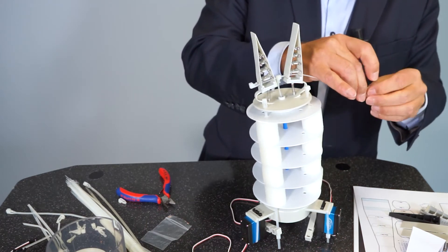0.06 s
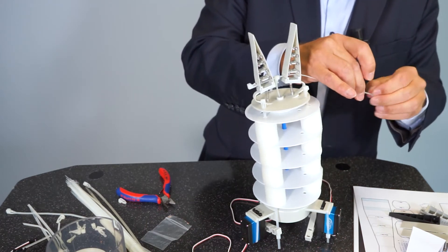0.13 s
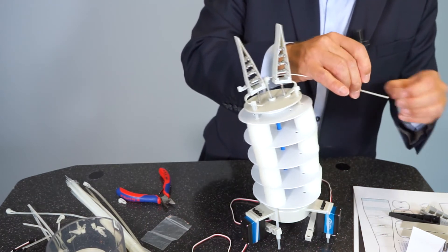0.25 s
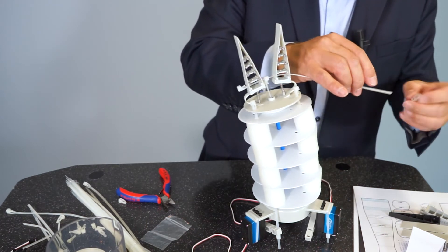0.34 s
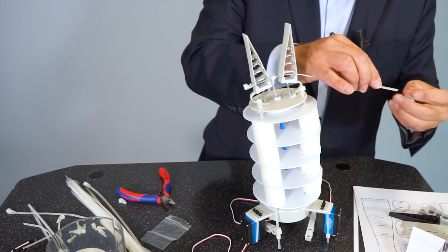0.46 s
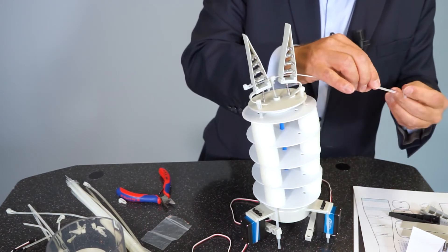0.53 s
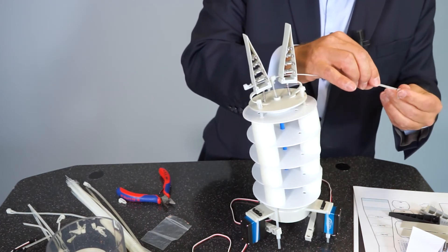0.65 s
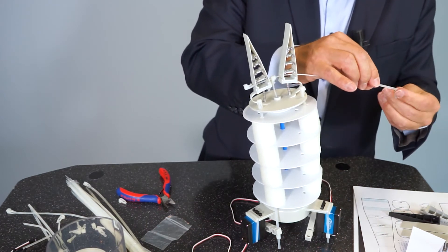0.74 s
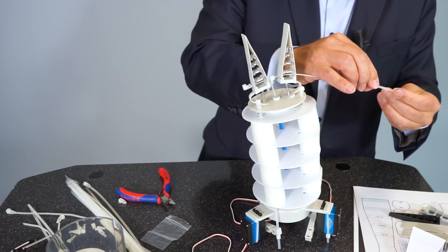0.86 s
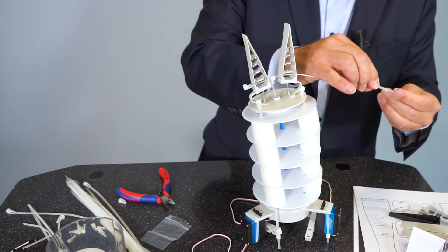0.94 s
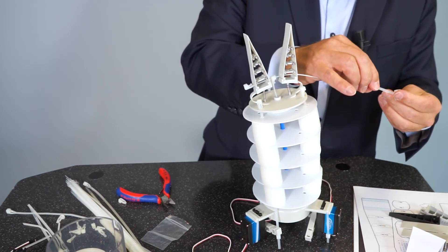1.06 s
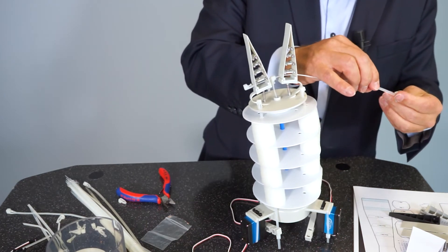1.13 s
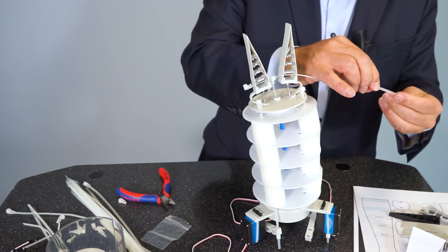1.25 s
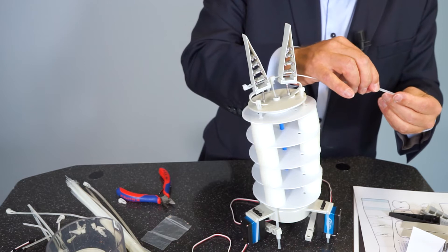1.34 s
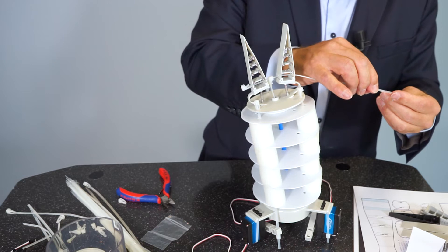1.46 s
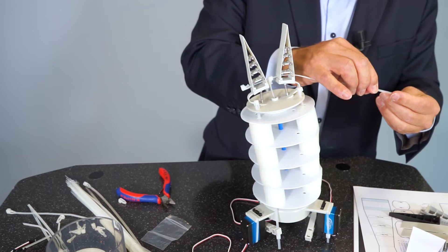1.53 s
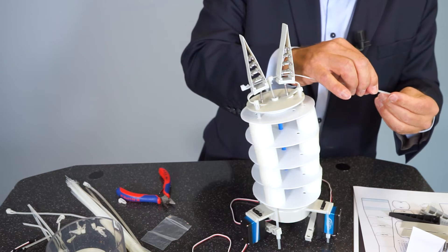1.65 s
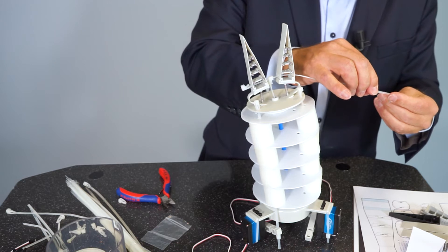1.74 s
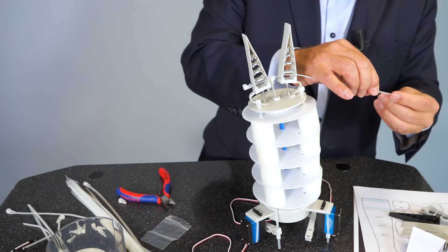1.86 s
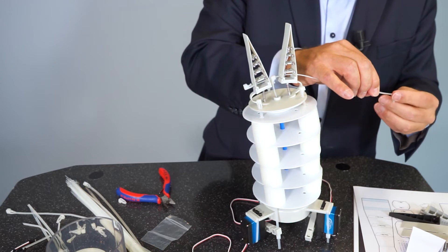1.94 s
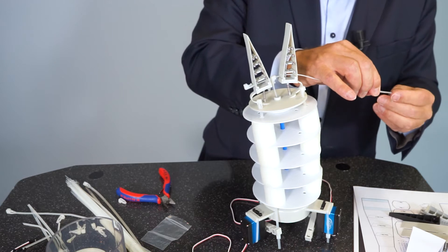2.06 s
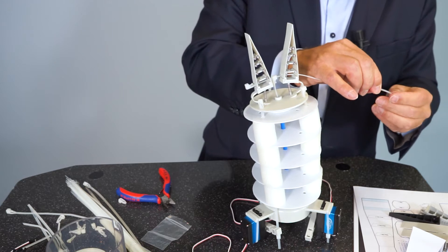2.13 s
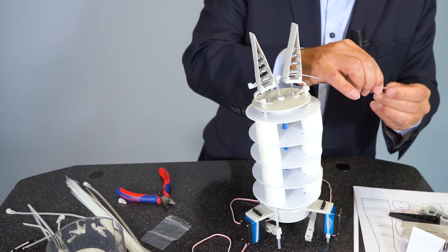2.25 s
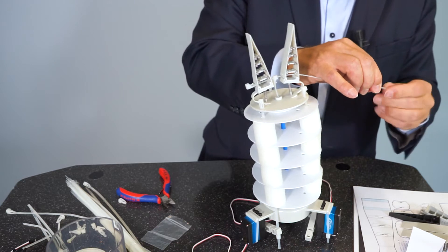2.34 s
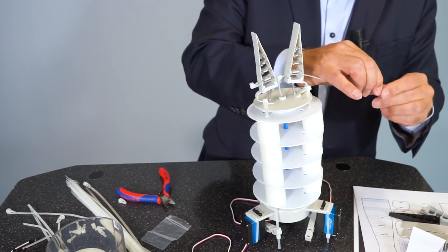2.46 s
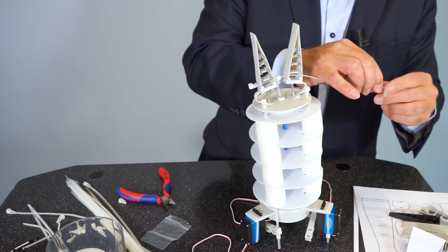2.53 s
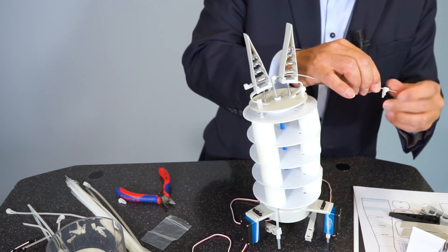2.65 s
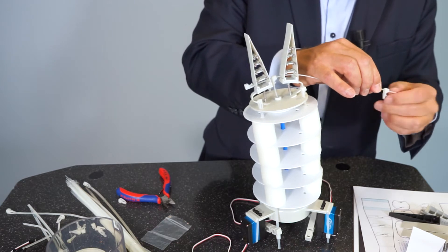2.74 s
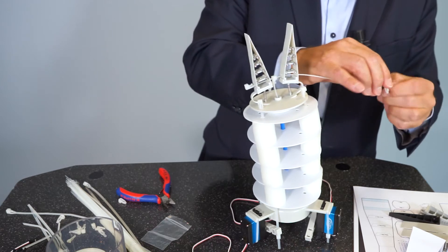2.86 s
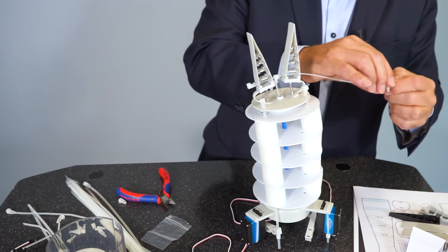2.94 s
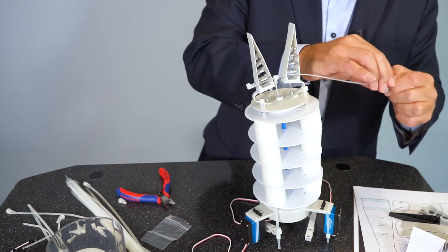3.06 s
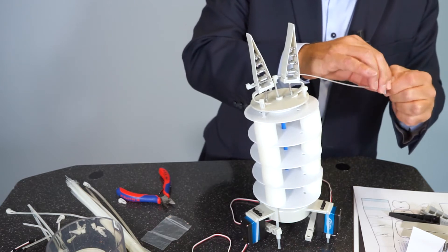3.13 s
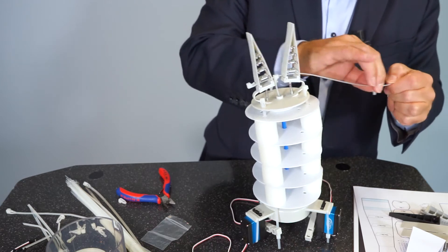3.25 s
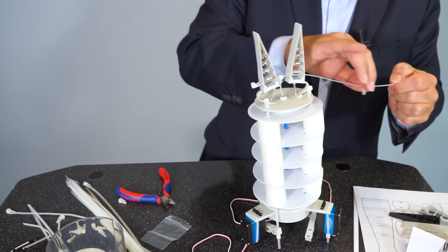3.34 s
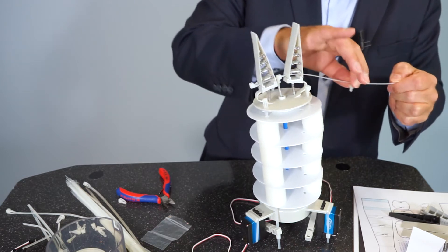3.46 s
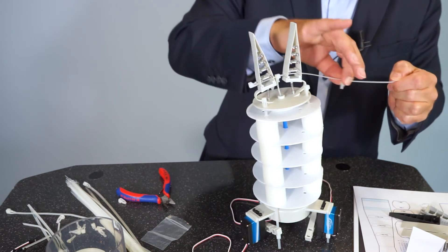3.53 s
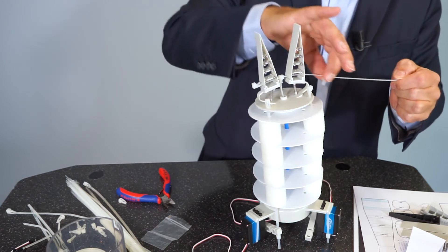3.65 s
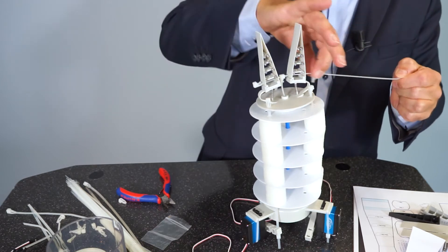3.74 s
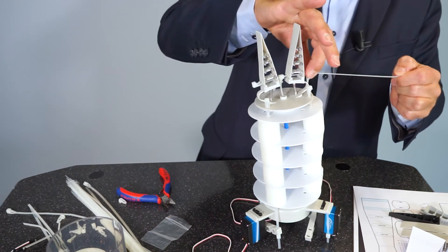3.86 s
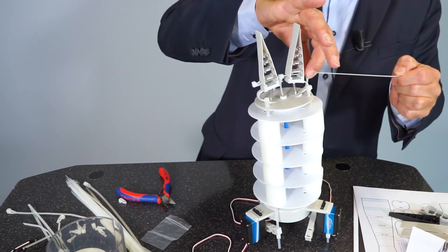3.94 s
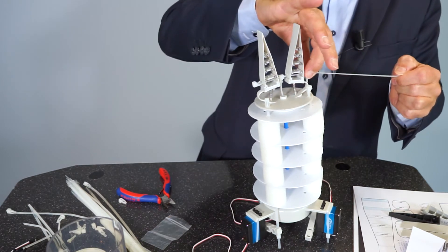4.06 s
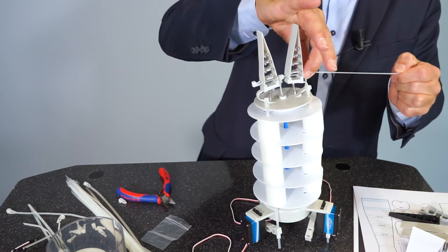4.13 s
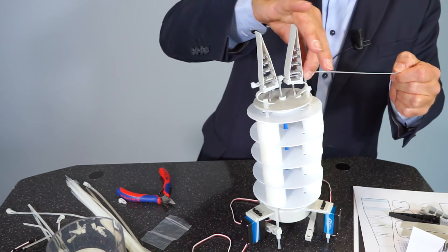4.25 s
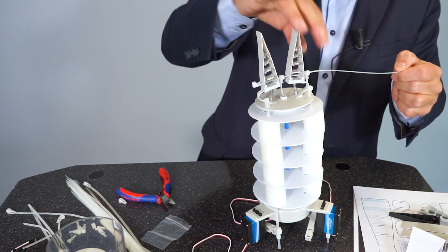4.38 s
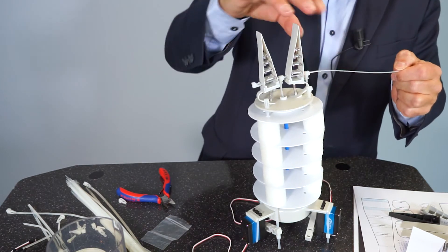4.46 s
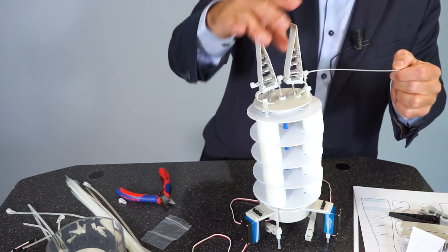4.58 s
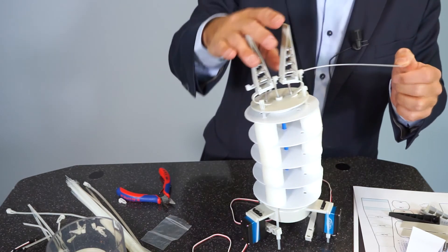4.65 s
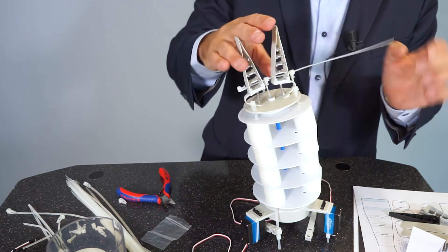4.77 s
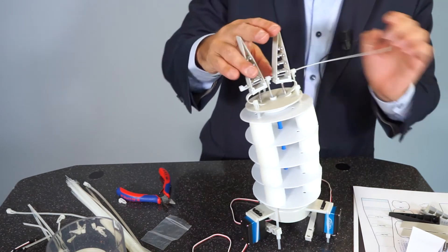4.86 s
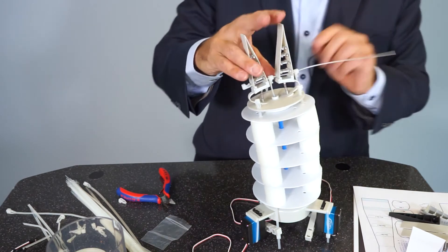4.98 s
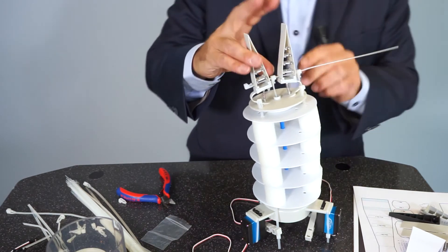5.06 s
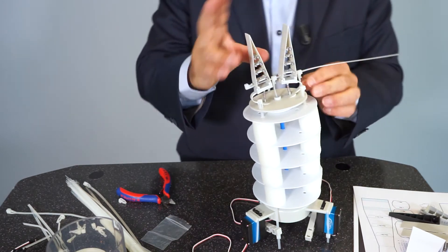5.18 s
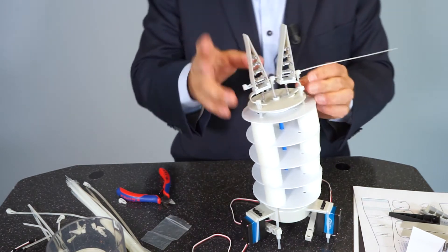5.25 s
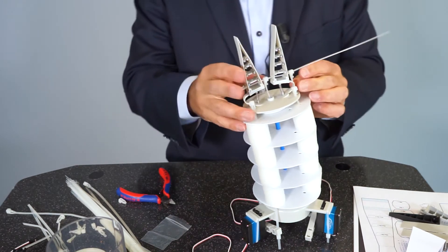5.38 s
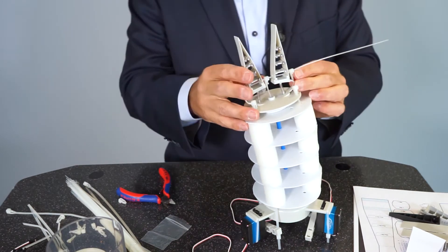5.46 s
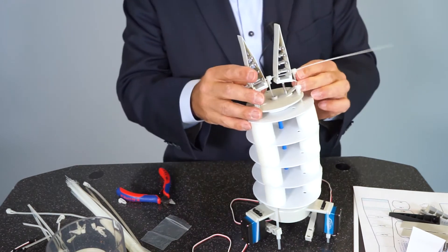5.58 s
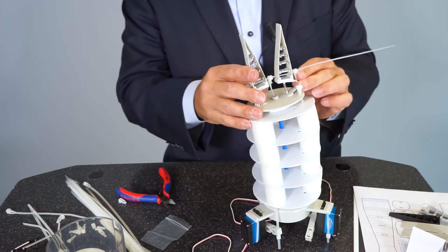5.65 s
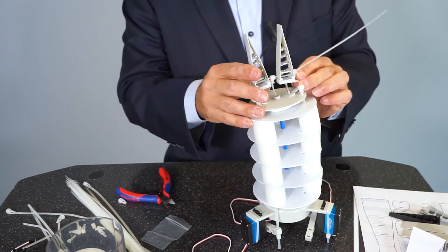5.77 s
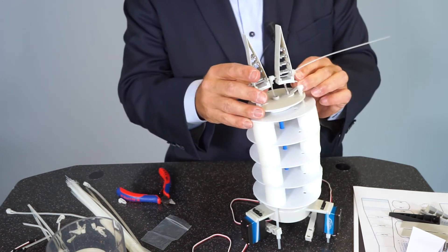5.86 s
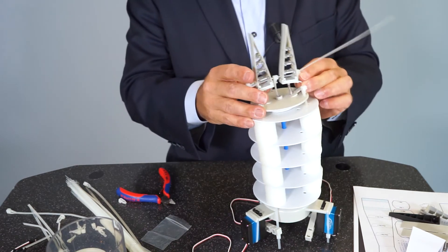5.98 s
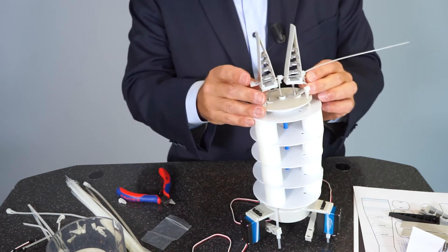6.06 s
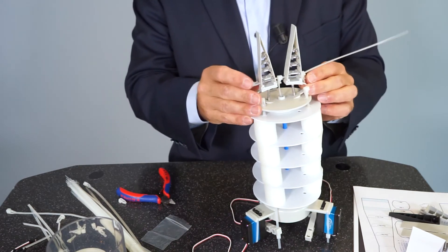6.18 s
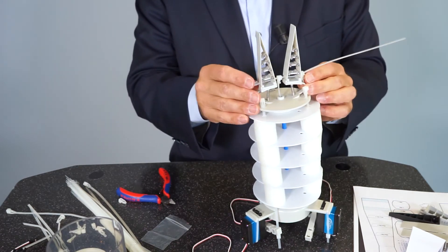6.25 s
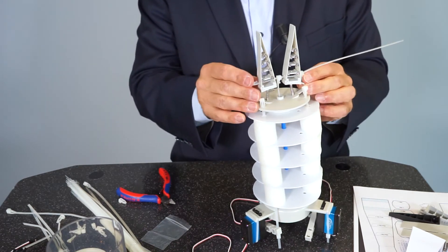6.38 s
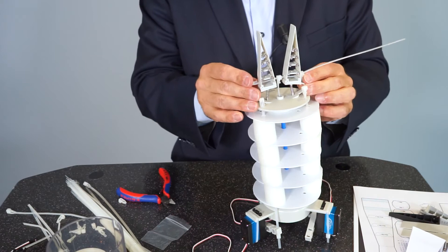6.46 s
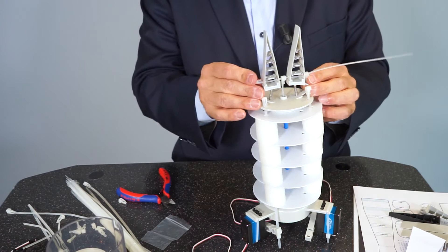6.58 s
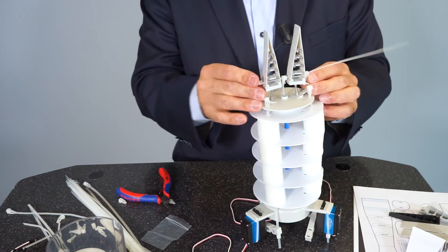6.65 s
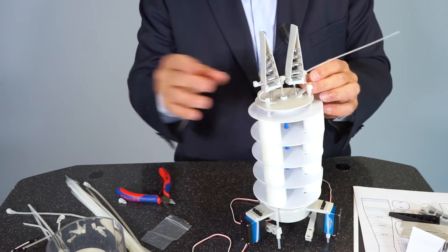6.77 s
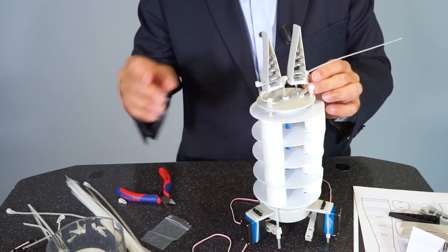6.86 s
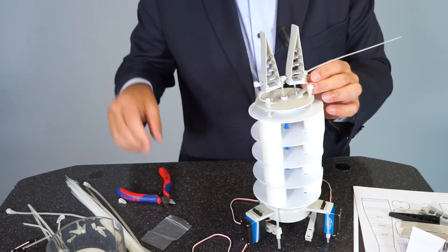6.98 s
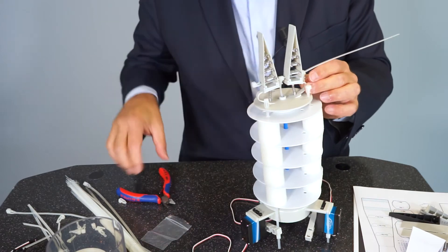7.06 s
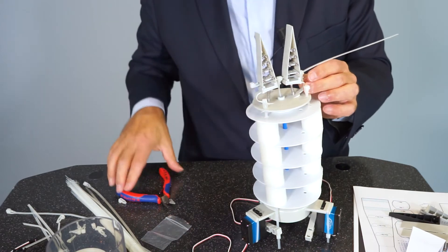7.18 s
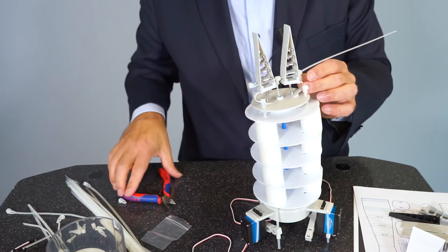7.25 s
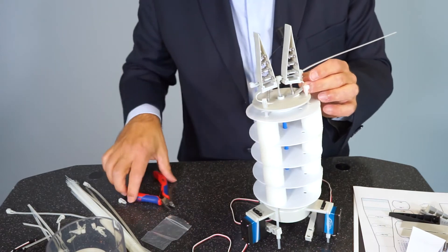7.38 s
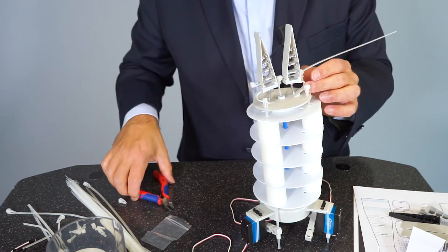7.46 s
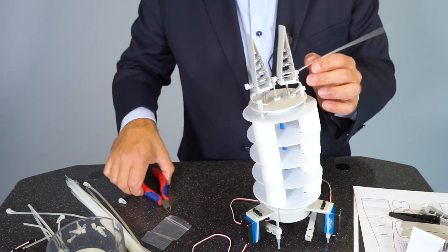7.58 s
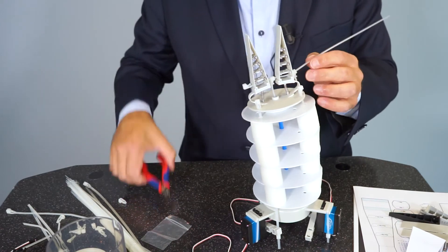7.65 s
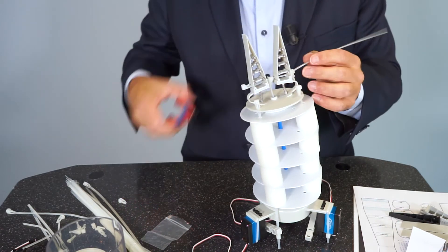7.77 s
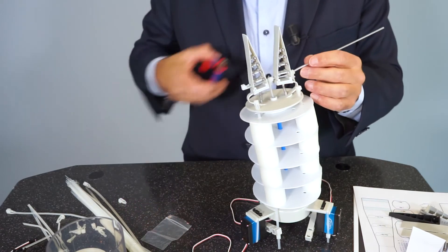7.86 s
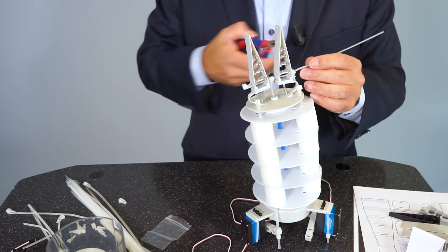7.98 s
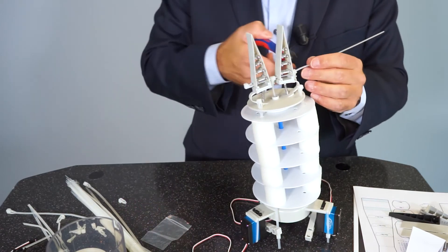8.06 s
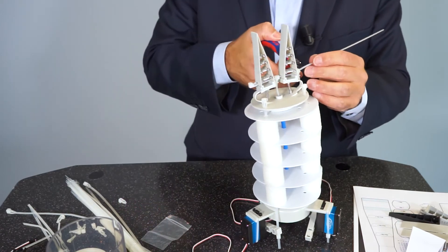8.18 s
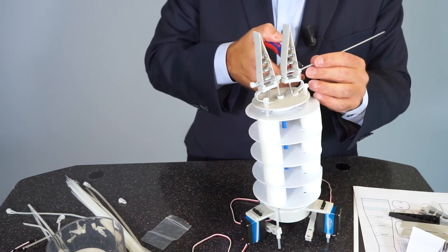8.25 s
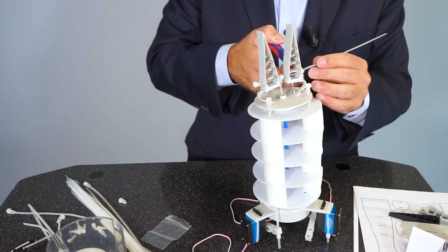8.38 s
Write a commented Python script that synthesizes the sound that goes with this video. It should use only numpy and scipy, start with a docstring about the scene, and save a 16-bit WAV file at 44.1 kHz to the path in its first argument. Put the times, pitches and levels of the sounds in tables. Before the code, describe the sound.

Crisp ratchet snaps and short buzzing zips of a plastic strap, then cloth rustle, a dull bump and pliers lifted with a knock, over faint hum.

```python
"""A cable tie is ratcheted tight on a plastic model: single teeth, long zips, a few last teeth.
Each tooth is a snap with a short ragged chatter that excites the modes of pawl, head, strap and model.
Sleeves rustle as filtered noise, the model is bumped, and side cutters squeak and knock as they
leave the table. A small room answers each impact by convolution; mains hum and hiss lie below."""
import sys
import numpy as np
from scipy import signal
from scipy.fft import rfft, irfft
from scipy.io import wavfile
from scipy.ndimage import uniform_filter1d

SR = 44100
rng = np.random.default_rng(int(sys.argv[2]) if len(sys.argv) > 2 else 0)


def inscribe(sig):
    """Save sig as 16-bit PCM at rate SR to the path in sys.argv[1].

    A 1-D sig is mono; a 2-D sig holds one channel per row.
    Samples are clipped to [-1, 1] before scaling.
    """
    pcm = np.round(np.clip(np.atleast_2d(sig).T, -1, 1) * 32767)
    wavfile.write(sys.argv[1], SR, pcm.astype(np.int16))


N = 370881

# damped modes that a tooth excites in each part: f/Hz, relative level/dB, t60/s
PAWL_MODES = [(13090, -17, 0.004), (14580, -3, 0.006), (15170, 3.5, 0.0016)]
HEAD_MODES = [(9500, -3, .002), (10700, 0, .003), (12000, 1, .0035)]
STRAP_MODES = [(2946, -2, 0.014), (3540, 7, 0.0036), (5230, 8, 0.0036), (5940, 15, 0.0018),
               (7000, 19.5, 0.00073), (8200, 0, 0.0097)]
MODEL_MODES = [(395, 1.5, 0.011), (730, -0.5, 0.0055), (1440, -2.5, 0.018), (1700, -4, 0.013),
               (2490, -3, 0.013)]
MODE_COUNT = len(PAWL_MODES + HEAD_MODES + STRAP_MODES + MODEL_MODES)
MODEL_RE_STRAP_DB = -7.5
# impacts of the cutters on the table top: t/s, level/dB
KNOCKS = [(7.6629, -6.5), (7.6664, -13), (7.679, -20)]


def gain_of(db):
    """Amplitude ratio: 20 dB is a factor of ten."""
    return 10 ** (np.asarray(db) / 20)


def evened(x):
    """Normalization to unit rms."""
    return x / np.sqrt(np.mean(x ** 2) + 1e-20)


def smoothed_chance(count, size):
    """Moving average over successive teeth: neighbours get similar mode offsets, rms 1 overall."""
    chance = rng.standard_normal((count, 2, MODE_COUNT))
    return evened(uniform_filter1d(chance, size=size, axis=0))


def read(points, hz):
    """Interpolation of a curve along a logarithmic frequency axis."""
    f, value = np.transpose(points)
    return np.interp(np.log(hz + 1), np.log(f + 1), value)


def add(mix, s, sound):
    """Superposition: the sound is summed into the mix from s seconds on."""
    part = mix[round(s * SR):][:len(sound)]
    part += sound[:len(part)]


def ring(modes, size, shift=0., share_db=0.):
    """Modal sum of damped sines, peak 1; shift detunes each mode, share_db is how hard it is struck."""
    hz, db, t60 = np.transpose(modes)[:, :, None]
    t = np.arange(size) / SR
    pitch = hz * (1 + np.reshape(shift, (-1, 1)))
    level = db + np.reshape(share_db, (-1, 1))
    sign = (-1) ** np.arange(len(modes))[:, None]  # neighbouring modes start in opposite directions
    swings = sign * gain_of(level - 60 * t / t60) * np.sin(2 * np.pi * pitch * t)
    sound = swings.sum(0)
    return sound / abs(sound).max()


def noise(spectrum, patchy_db, size):
    """Random short-time spectra, coloured and modulated by drifting patches, give noise of rms 1."""
    hop = size // 4
    hz = np.fft.rfftfreq(size, 1 / SR)
    real, imaginary, patches = rng.standard_normal((N // hop + 5, len(hz), 3)).T
    patches = uniform_filter1d(patches, size=10, axis=0)
    patches = evened(uniform_filter1d(patches, size=10, axis=1))
    level_db = read(spectrum, hz)[:, None] + patchy_db * patches
    z = (real + 1j * imaginary) * gain_of(level_db)
    return evened(signal.istft(z, nperseg=size, noverlap=size - hop)[1][:N])


def background():
    """Steady mains harmonics add to the broadband noise of room air and microphone hiss."""
    # mains harmonics: f/Hz, rms level/dB
    harmonics = [(100, -53.5), (200, -48), (300, -69), (400, -62), (500, -66.5), (600, -66)]
    # spectrum of air and hiss: f/Hz, relative level per Hz/dB
    air = [(12, -90), (20, -11), (102, -6.5), (131, -8), (205, -7), (263, -9), (303, -8.5), (330, -10.5),
           (358, -12.5), (1870, -28.5), (14900, -40), (16200, -49)]
    t = np.arange(N) / SR
    hum = np.zeros(N)
    for hz, db in harmonics:
        hum += gain_of(db) * np.sqrt(2) * np.sin(2 * np.pi * (hz * t + rng.random()))
    return hum + gain_of(-44.5) * noise(air, 1.0, size=2048)


def sleeves():
    """Friction noise of cloth on cloth: slightly grainy fizz, swish and duller rub, over a rumble."""
    # arm movements: peak t/s, rise per 20 dB/s, fall per 20 dB/s,
    # then levels at the peak: fizz/dB, swish/dB, rub/dB
    arms = [(.31, 0.45, 0.29, -64, -53, -48.5), (4.27, .1, 0.9, -66, -65, -86),
            (4.76, 0.18, 0.33, -87, -56, -51), (5.13, 0.16, 0.16, -73, -64, -49),
            (5.28, 0.73, 0.26, -53.5, -47.5, -59), (5.45, 0.33, 0.35, -46.5, -48.5, -41.5),
            (5.66, 0.6, 0.33, -54, -69, -47.5), (5.83, 0.17, 0.12, -57, -43, -60),
            (6.3, 1, .6, -68, -60, -54), (6.6, 0.071, 0.079, -61, -54, -45),
            (7.05, 0.57, 0.53, -52, -45.5, -39), (7.17, 0.24, 0.074, -63, -44, -37.5),
            (7.39, 0.36, 0.2, -70, -48.5, -40.5), (7.58, 0.49, 0.5, -61, -52, -40),
            (7.85, 0.2, 0.13, -52, -47, -43.5), (8.1, 0.31, 0.21, -50, -41.5, -38),
            (8.36, 0.6, 0.39, -64, -59, -49.5)]
    # noise spectra: f/Hz, relative level per Hz/dB
    fizz = [(4000, -18), (7000, -2), (11000, -2), (14000, -10), (16000, -25)]
    swish = [(1000, -12), (2000, -7), (4000, -10), (7000, -16), (11000, -22.5)]
    rub = [(150, -12), (300, 11), (600, 3.5), (1200, -1.5), (2200, -7.5), (4000, -40.5)]
    rumble = [(15, 7), (40, 15), (100, 16), (200, 12.5), (400, -31)]
    rumble_re_rub_db = -1.5

    grain = gain_of(1.04 * evened(uniform_filter1d(rng.standard_normal(N), size=300)))
    layers = [grain * noise(cloth, 1.5, size=512) for cloth in (fizz, swish, rub)]
    layers.append(noise(rumble, 1.5, size=2048))
    t = np.arange(0, N, 64) / SR
    peak, rise, fall, fizz_db, swish_db, rub_db = np.transpose(arms)[:, :, None]
    swell_db = -20 * np.where(t < peak, (peak - t) / rise, (t - peak) / fall)
    out = np.zeros(N)
    for layer, db in zip(layers, (fizz_db, swish_db, rub_db, rub_db + rumble_re_rub_db)):
        level = np.linalg.norm(gain_of(swell_db + db), axis=0)  # the movements add in power
        out += layer * np.interp(np.arange(N) / SR, t, level)
    return out


def ticks():
    """Band-filtered decaying noise: plastic parts scrape briefly around one pitch."""
    # ticks: t/s, peak level/dB, centre f/Hz, spread/octaves, time to fall 30 dB/s
    scrapes = [(0.292, -30, 2370, 1.3, 0.014), (4.394, -36.5, 2960, 1.2, 0.0092),
               (4.663, -39, 5000, 1.3, .006), (5.546, -31, 4470, 0.88, 0.012),
               (6.31, -40.5, 3500, 0.97, 0.037), (6.572, -33, 3980, 1.1, 0.0073),
               (6.601, -34.5, 7500, 1, 0.0065), (6.77, -35, 2500, 1.1, .006),
               (6.777, -30.5, 3160, 0.45, 0.004), (6.99, -33, 6000, 1.8, .006),
               (7.074, -29, 1700, 0.34, 0.011), (7.492, -37, 9200, .3, .006), (7.647, -29, 5000, 1.5, .006),
               (7.664, -29, 6000, 0.61, 0.0049), (7.763, -45, 7000, 1.2, .006),
               (7.793, -32, 2900, 0.94, 0.013), (8.226, -35, 7300, 0.47, 0.16)]
    out, t = np.zeros(N), np.arange(4096) / SR
    lead = 100  # samples of room for the filter to ring ahead of the scrape
    hz = np.fft.rfftfreq(8192, 1 / SR)
    for s, db, centre_hz, octaves, length in scrapes:
        scrape = rng.standard_normal(len(t)) * gain_of(-30 * t / length)
        band = np.exp(-.5 * (np.log2((hz + 1) / centre_hz) / octaves) ** 2)
        tick = irfft(rfft(np.r_[np.zeros(lead), scrape], 8192) * band)[:len(t)]
        add(out, s - lead / SR, gain_of(db) * tick / abs(tick).max())
    return out


def bumps():
    """Dull impacts: each is a single damped oscillation whose onset a moving average softens."""
    # bumps: t/s, level/dB, f/Hz, t60/s
    blows = [(0.329, -37, 80, 0.23), (5.12, -23, 500, 0.006), (5.156, -14.5, 438, 0.02),
             (5.156, -21, 860, 0.014), (5.158, -29, 1630, .02), (5.161, -22.5, 76, 0.077),
             (7.038, -28, 65, 0.048), (7.145, -30, 97, 0.17)]
    out = np.zeros(N)
    for s, db, hz, t60 in blows:
        swing = ring([(hz, 0, t60)], size=8000)
        add(out, s, -gain_of(db) * uniform_filter1d(np.r_[np.zeros(16), swing], size=16))
    return out


def tooth(chance, pawl_db, head_db, strap_db, model_db, pitch=1, drag=1):
    """Source and resonator: the pawl's snap, in noise that swells and dies, is convolved with the modes."""
    t = np.arange(-40, 160) / SR  # the snap falls at 0
    # a gentle pull lets the pawl slip off raggedly, a hard one snaps it clean
    loudest_db = max(pawl_db, strap_db, head_db)
    ragged = drag * np.clip(.08 * gain_of(-.6 * (loudest_db + 9)), .08, .22)
    swell = np.where(t < 0, gain_of(60 * t / .003), gain_of(-60 * t / .012))
    contact = ragged * rng.standard_normal(len(t)) * swell
    contact[t == 0] = 1

    parts = [(PAWL_MODES, pawl_db + .3, 0), (HEAD_MODES, head_db - .3, 0),
             (STRAP_MODES, strap_db - .3, pitch - 1), (MODEL_MODES, model_db, 0)]
    rings = 0
    for modes, db, shift in parts:
        detune, uneven = chance[:, :len(modes)]
        chance = chance[:, len(modes):]
        modal = ring(modes, size=900, shift=shift + 0.042 * detune, share_db=1.01 * uneven)
        rings = rings + gain_of(db) * modal
    # so small a thing radiates little bass
    thin = signal.butter(2, 250, "high", fs=SR, output="sos")
    return signal.sosfilt(thin, np.convolve(contact / np.linalg.norm(contact), rings))


def single_teeth():
    """Separate impulsive excitations: the teeth pass the pawl one at a time."""
    # teeth, each snapping 0.9 ms after its time: t/s, strap level/dB, pawl level/dB
    teeth = [(1.113, -40, -55), (1.691, -32.5, -35), (2.1005, -16, -5.5), (2.2352, -15.5, -14.5),
             (2.275, -12, -44), (2.2851, -13, -20), (2.423, -19, -19), (2.5157, -8.5, -15),
             (3.261, -12.5, 0.5), (3.2702, -13.5, -1), (3.2764, -11, -2.5), (3.2824, -13, -11),
             (3.2885, -13.5, -19), (3.293, -16, -4), (3.4917, -14, -17), (3.5008, -18, -17),
             (3.513, -15, -23), (3.524, -16, -10), (3.5328, -16.5, -18), (3.5396, -16, -17),
             (3.5488, -17, -13), (3.5549, -17, -20), (3.564, -18, -12), (3.5682, -12, -12),
             (3.8378, -14, -25), (3.8483, -12.5, -13), (3.8681, -10.5, -25), (3.881, -23, -22),
             (4.0228, -8, -13.5), (4.055, -8, -13), (4.1495, -9, -11), (4.1998, -8.5, -18),
             (5.747, -14.5, -13), (5.7575, -19, -22), (5.7612, -14, -21), (5.7729, -13, -13),
             (5.7876, -16, -25), (5.798, -19, -31), (5.8028, -15, -36), (5.8194, -13.5, -50),
             (5.832, -29, -51), (5.85, -42, -56)]
    # a hand presses on the model and damps it between: start t/s, end t/s
    held = (3.95, 4.3)
    held_db = -5.5
    short_loop_pitch = 0.959  # strap pitch factor once the loop has closed round the model
    tight_s, tight_drag = 5., 2.6  # from here (s) the pawl drags this many times more over each tooth
    out = np.zeros(N)
    for (s, strap_db, pawl_db), chance in zip(teeth, smoothed_chance(len(teeth), size=4)):
        head_db = strap_db - 0.5 + 0.1 * (pawl_db - strap_db)
        model_db = strap_db + MODEL_RE_STRAP_DB + held_db * (held[0] < s < held[1])
        pitch = short_loop_pitch if s > held[0] else 1
        drag = tight_drag if s > tight_s else 1
        add(out, s, tooth(chance, pawl_db, head_db, strap_db, model_db, pitch, drag))
    return out


def zips():
    """Periodic excitation: fast teeth merge into a buzz, and the strap flaps at the tooth rate."""
    # fast pulls, one list each: t/s, tooth rate/(teeth per s)
    pulls = [
        [(2.4385, 97), (2.4954, 220), (2.5075, 130)],
        [(3.299, 243.3), (3.3203, 305.6), (3.3639, 288.8), (3.3967, 338.9), (3.4631, 161.9), (3.4831, 177.1)],
        [(3.5757, 191.7), (3.6425, 274.9), (3.6545, 326.5), (3.6814, 303.7), (3.7122, 326.2), (3.741, 261.3),
         (3.7719, 242.6), (3.8353, 283.4)],
    ]
    # levels along the pulls: t/s, strap level/dB, pawl level/dB, head level/dB
    strengths = [(2.438, -20, -25, -24), (2.47, -20.5, -25, -16.5), (2.507, -11.5, -21, -9),
                 (3.3, -14, -6.5, -18.5), (3.37, -13.5, -18, -14), (3.43, -14.5, -16, -15),
                 (3.484, -14.5, -11.5, -18), (3.575, -13.5, -17, -16), (3.65, -12.5, -14.5, -17.5),
                 (3.73, -12, -10, -19.5), (3.835, -12, -17, -22)]
    creep_per_s = 0.13  # the strap creeps up in pitch along a pull
    flap_db, flap_db_per_octave = -18, 3  # flap re strap level at 300 teeth per s, and its slope
    flap_overtone = .06
    out = np.zeros(N)
    when, *columns = np.transpose(strengths)
    for rows in pulls:
        s, rate = np.transpose(rows)
        t = np.arange(s[0], s[-1], 1 / SR)
        rate = np.interp(t, s, rate)
        passed = np.cumsum(rate) / SR  # teeth passed so far
        levels = np.array([np.interp(t, when, c) for c in columns])
        pitch = 1 + creep_per_s * (t - t.mean())
        teeth = np.searchsorted(passed, np.arange(passed[-1]))
        # neighbouring teeth ring alike: the colour drifts as the strap slides
        for i, chance in zip(teeth, smoothed_chance(len(teeth), size=12)):
            late, strength = rng.standard_normal(2)
            strap_db, pawl_db, head_db = levels[:, i] + 0.21 * strength
            model_db = strap_db + MODEL_RE_STRAP_DB
            snap = tooth(chance, pawl_db, head_db, strap_db, model_db, pitch[i])
            add(out, t[i] - .001 + .0001 * late, snap)

        flap = np.sin(2 * np.pi * passed) + flap_overtone * np.sin(4 * np.pi * passed)
        tugs = evened(uniform_filter1d(rng.standard_normal(len(t)), size=300))
        flap *= gain_of(2.8 * tugs)  # uneven tugs
        level_db = levels[0] + flap_db + flap_db_per_octave * np.log2(rate / 300)
        add(out, s[0], gain_of(level_db) * np.sqrt(2) * flap * signal.windows.tukey(len(t), .15))
    return out


def squeaks():
    """Frequency-modulated sines: thin squeaks glide and waver while the cutters are gripped."""
    # squeaks, one list each: t/s, f/Hz, level/dB
    glides = [
        [(7.335, 10300, -68), (7.37, 11400, -79), (7.42, 10400, -56)],
        [(7.445, 9200, -64), (7.48, 8000, -64)],
        [(7.525, 8400, -60), (7.553, 8860, -60), (7.6, 8400, -57), (7.632, 8200, -60)],
    ]
    out = np.zeros(N)
    for rows in glides:
        s, hz, db = np.transpose(rows)
        t = np.arange(s[0], s[-1], 1 / SR)
        glide = uniform_filter1d(np.interp(t, s, hz), size=800, mode="nearest")
        waver = 40 * evened(uniform_filter1d(rng.standard_normal(len(t)), size=200))  # Hz
        tone = np.sqrt(2) * np.sin(2 * np.pi * np.cumsum(glide + waver) / SR)
        add(out, s[0], gain_of(np.interp(t, s, db)) * tone * signal.windows.tukey(len(t), .3))
    return out


def knocks():
    """Modal response of the table top to short impacts of the cutters."""
    # table top modes: f/Hz, relative level/dB, t60/s
    table_modes = [(406, -1, 0.1), (510, -21, 0.12), (615, -12, 0.35), (759, -4.5, 0.055),
                   (895, -20, 0.075), (920, -16, 0.1), (1070, -10, 0.038), (1203, 3.5, 0.051),
                   (1475, 0, 0.03), (1560, -4, 0.036), (1704, 2, 0.035), (1840, -8, 0.051),
                   (2020, -11, 0.078), (2480, -14, 0.062), (3200, -4, 0.012), (3950, -5, 0.024),
                   (5000, -6.5, 0.0092)]
    out = np.zeros(N)
    for s, db in KNOCKS:
        detune, uneven = rng.standard_normal((2, len(table_modes)))
        rings = ring(table_modes, size=14000, shift=.006 * detune, share_db=1.5 * uneven)
        add(out, s, gain_of(db) * np.convolve(rings, np.hanning(8) / 3.5))  # soft contact
    return out


def clatter():
    """Exponentially decaying coloured noise: loose things clatter after the first knock."""
    # clatter spectrum: f/Hz, relative level per Hz/dB
    spectrum = [(200, -43), (400, 9.5), (1000, -0.5), (2000, -3), (2600, -19), (4500, -26), (9000, -43)]
    out, t = np.zeros(N), np.arange(SR // 2) / SR
    swell = gain_of(-24.5 - 60 * t / .5) * np.minimum(t / 0.0016, 1)
    add(out, KNOCKS[0][0], swell * noise(spectrum, 0.75, size=512)[:len(t)])
    return out


def room(x):
    """Convolution with smeared echoes from table and walls and a sparse tail dying band by band."""
    # early echoes: delay/s, level/dB
    echoes = [(.0024, -18), (.0111, -25), (.0148, -24), (.028, -30)]
    # reverberation time: f/Hz, t60/s
    decay = [(250, 0.58), (1000, 0.48), (4000, 0.33), (12000, 0.13)]
    taps = np.zeros(SR // 2)
    at = np.arange(400, len(taps) - 20, 20)
    taps[at + rng.integers(0, 20, len(at))] = rng.choice([-1., 1.], len(at))
    hz, t, z = signal.stft(taps, SR, nperseg=256)
    dying = z * gain_of(-60 * t / read(decay, hz)[:, None])
    tail = signal.istft(dying, SR, nperseg=256)[1]
    tail = gain_of(-13) * tail / np.linalg.norm(tail)
    for s, db in echoes:
        smear = rng.standard_normal(90) * np.hanning(90)
        add(tail, s, gain_of(db) * smear / np.linalg.norm(smear))
    return x + signal.fftconvolve(x, tail)[:N]


def scene():
    """Superposition: the impacts and squeaks excite the room; cloth and background stay dry."""
    tie = single_teeth() + zips()
    cutters = squeaks() + knocks() + clatter()
    mono = room(tie + ticks() + bumps() + cutters) + sleeves() + background()
    return np.array([mono, mono])


def record(dry):
    """Saturation: the input stage rounds off the loudest snaps; a linear-phase low-pass follows."""
    knee, edge_hz = .6, 15780
    bent = np.sign(dry) * (knee + .3 * np.tanh((abs(dry) - knee) / .3))
    rounded = np.where(abs(dry) < knee, dry, bent)
    low_pass = signal.firwin(511, edge_hz, window=("kaiser", 9), fs=SR)
    return signal.oaconvolve(rounded, low_pass[None], "same")


dry = scene()
out = record(dry)
inscribe(out)
```